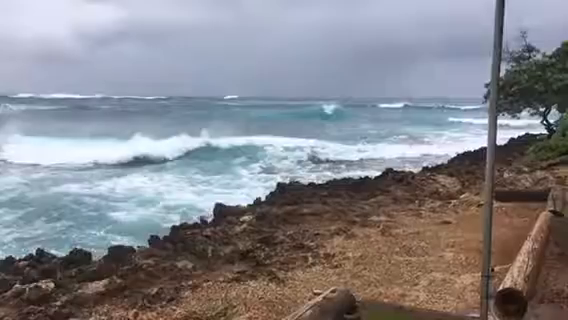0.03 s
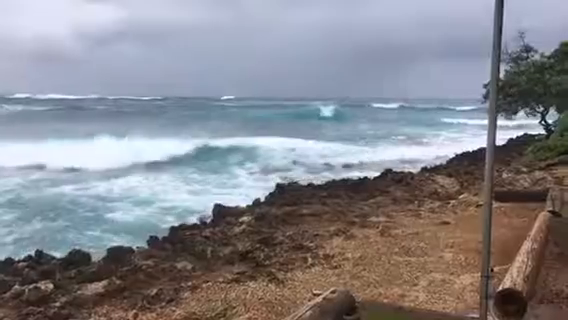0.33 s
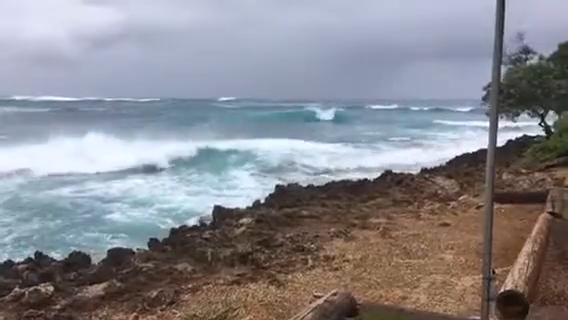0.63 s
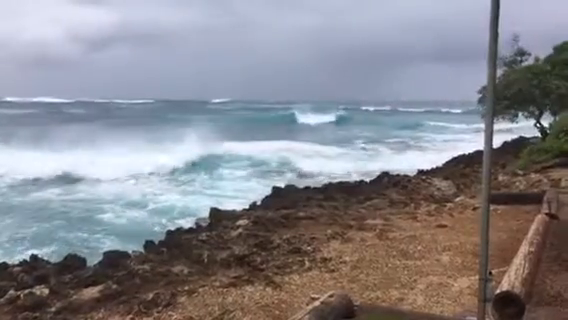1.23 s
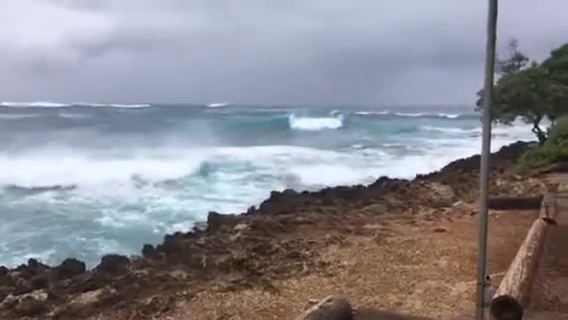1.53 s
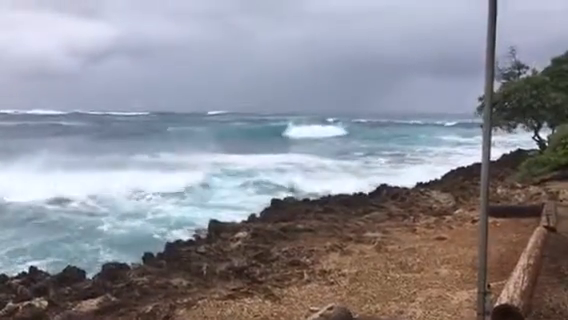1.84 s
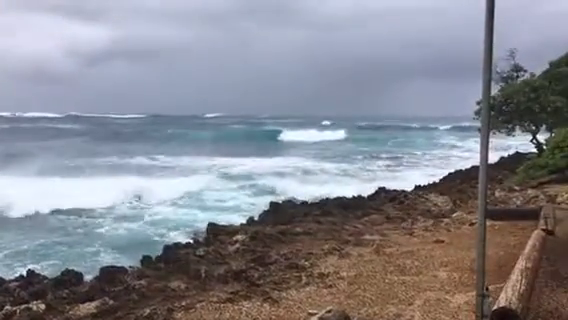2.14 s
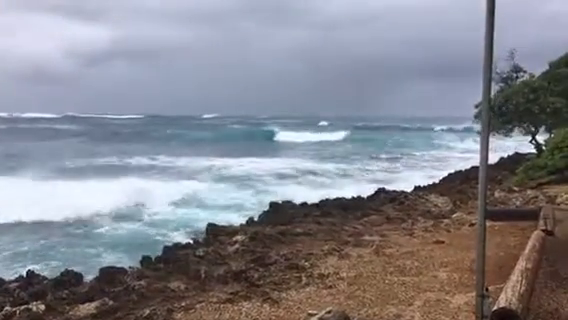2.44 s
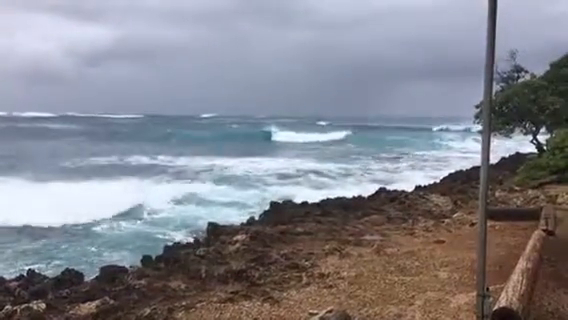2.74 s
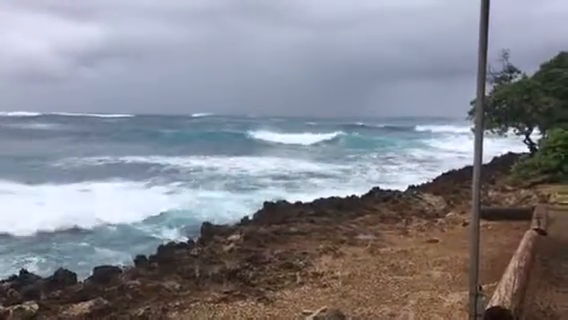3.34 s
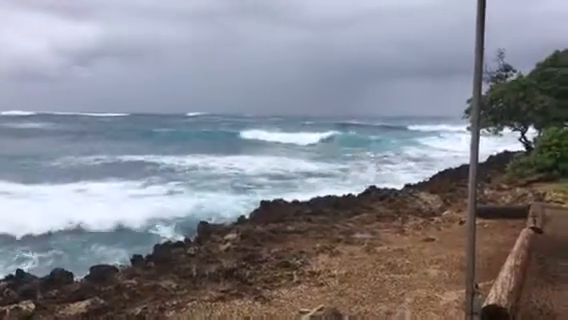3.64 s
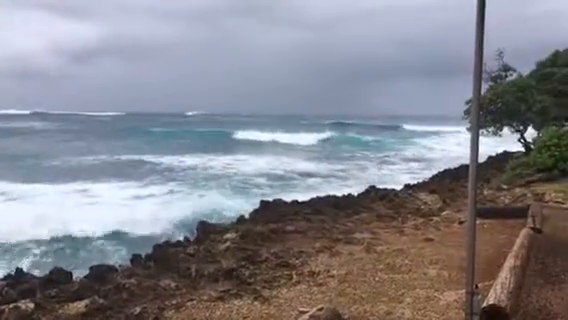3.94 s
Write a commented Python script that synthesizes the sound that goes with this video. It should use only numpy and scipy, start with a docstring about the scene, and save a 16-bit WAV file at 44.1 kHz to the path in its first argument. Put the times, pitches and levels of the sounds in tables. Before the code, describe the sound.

Ocean waves break with hissing foam as wind rumbles and thumps on the microphone.

```python
"""Surf breaks on a rocky shore: a steady roar, and foam that hisses louder as a wave washes in.
Gusty wind rumbles on the microphone; eddies flutter across it and the sharpest ones thump.
Roar, foam and wind are coloured noise riding level curves; each thump is one pressure pulse.
Two tiny ticks sound close by. The sound begins after a moment of silence."""
import sys
import numpy as np
from scipy import signal
from scipy.fft import rfft, irfft, next_fast_len
from scipy.io import wavfile
from scipy.ndimage import uniform_filter1d, map_coordinates

SR = 44100
rng = np.random.default_rng(int(sys.argv[2]) if len(sys.argv) > 2 else 0)


def master_out(mix):
    """Clip the mix to full scale and print it as 16-bit PCM to the path in sys.argv[1]."""
    frames = np.transpose(np.atleast_2d(mix))
    ceiling = np.clip(frames, -1, 1)
    pcm = np.round(ceiling * 32767).astype(np.int16)
    wavfile.write(sys.argv[1], SR, pcm)


N = 176400

# eddies crossing the microphone: t/s, level/dB, half length/s, brightness/(dB per octave)
WIND_EDDIES = [(0.137, -24.5, 0.011, 2), (.186, -18.5, 0.011, 4.5), (0.267, -17.5, 0.011, 3),
               (0.3, -15.5, 0.0069, -3), (0.363, -21, 0.015, -0.5), (0.578, -23, 0.0064, 2),
               (.616, -19, .007, -1), (0.64, -19, 0.0048, -3), (0.662, -27, 0.0054, 4.5),
               (0.723, -26, .006, 5.5), (0.757, -25, .01, 1), (0.792, -17.5, .012, 2.5),
               (.93, -15, 0.0056, 0.5), (0.963, -30, 0.023, 6.5), (1.055, -19.5, .017, 1),
               (1.144, -26, .008, 6.5), (1.207, -15.5, 0.0086, -3), (1.335, -15.5, .005, 0.5),
               (1.357, -18.5, 0.0055, -2), (1.553, -20.5, 0.013, -3.5), (1.683, -22.5, .011, 1.5),
               (1.873, -27, 0.0064, -4), (2.016, -30, .008, -1), (2.358, -17.5, .013, 1),
               (2.41, -26, 0.009, -3), (2.648, -25.5, 0.023, 2.5), (2.713, -16.5, .009, 1),
               (2.858, -21, 0.01, 2.5), (3.127, -20.5, 0.013, 2), (3.224, -21, 0.015, 2),
               (3.379, -30, 0.024, 6), (3.466, -19, 0.017, -0.5), (3.56, -32, .008, 3),
               (3.66, -22, .012, -1), (3.695, -21, 0.0066, 1.5), (3.727, -15, .005, -1),
               (3.808, -22.5, 0.0057, 1.5), (3.839, -28, 0.0061, 7), (3.909, -33, 0.019, 6)]


def breakers():
    """The steady roar of white water, churning slightly."""
    # swell of the roar: t/s, level/dB
    roar_levels = [(.12, -34), (.5, -33), (.85, -34), (.95, -30.5), (1.1, -33.5), (1.6, -34), (2.1, -33),
                   (2.4, -34), (2.7, -33.8), (3, -35.5), (3.5, -34.5), (4, -36)]
    # tone of the roar: f/Hz, level/dB
    roar_spectrum = [(60, 2), (200, -0.5), (500, 0), (800, -3), (1300, -4.5), (2000, -5.5), (2700, -12),
                     (3300, -10.5), (5000, -28), (16000, -60)]
    churn_db = 0.39 * wobble(per_s=11)
    return amp(curve(roar_levels) + churn_db) * rush(roar_spectrum, patchy_db=0.96)


def foam():
    """Foam hisses on the rocks, with a fine crackle of bursting bubbles."""
    # wash of the foam: t/s, level/dB
    foam_levels = [(.12, -42), (.22, -43.5), (.29, -42.5), (.4, -45), (.55, -44), (.82, -46), (.92, -41),
                   (1.02, -43), (1.47, -42), (1.56, -39), (1.68, -42), (1.97, -40), (2.07, -41.5),
                   (2.3, -40.8), (2.75, -42.7), (3.12, -42.5), (3.52, -44.5), (3.63, -42.5), (4, -45.2)]
    # tone of hiss and crackle: f/Hz, level/dB
    foam_spectrum = [(800, -12), (2600, -4.5), (3300, 0), (4300, 1.5), (4900, -4.5), (5400, -1.5),
                     (6400, 1.5), (8000, -1.5), (9000, 0), (9800, -2.5), (10400, -7.5), (11100, -4.5),
                     (12500, -10), (15500, -15.5)]
    pops_per_s, crackle_db = 460, -9.5  # level relative to the hiss
    pops = (rng.random(N) < pops_per_s / SR) * rng.standard_normal(N)
    crackle = unit(filtered(pops, colour(foam_spectrum)))
    wash = amp(curve(foam_levels) + 0.23 * wobble(per_s=18))
    hiss = rush(foam_spectrum, patchy_db=0.96)
    return wash * (hiss + amp(crackle_db) * crackle)


def wind_rumble():
    """Low, lumpy turbulence on the microphone follows the gusts and lifts around each eddy."""
    # strength of the gusts: t/s, level/dB
    gust_levels = [(.12, -17), (.17, -13.5), (.235, -20.5), (.31, -13), (.37, -22), (.44, -23.5),
                   (.56, -14), (.69, -16), (.81, -16), (.87, -21), (.93, -18), (1.06, -18), (1.16, -25.5),
                   (1.25, -22.5), (1.29, -26), (1.37, -25.5), (1.47, -26), (1.56, -28.5), (1.66, -24.5),
                   (1.9, -28.5), (2.12, -25), (2.36, -27.5), (2.5, -26.5), (2.62, -19), (2.71, -22.5),
                   (2.79, -26), (3.05, -27), (3.16, -22.5), (3.23, -26.5), (3.34, -29), (3.5, -22.5),
                   (3.78, -26.5), (3.86, -19), (3.95, -20.5), (4, -23.5)]
    # tone of the rumble: f/Hz, level/dB
    rumble_spectrum = [(15, -45), (25, -30), (36, -6.5), (55, -0.5), (75, -1.5), (110, -7.5), (170, -11.5),
                       (250, -19), (400, -31.5), (800, -42), (3000, -89)]
    surge_db, surge_half_s = 3, 0.019
    t = np.arange(N) / SR
    air = unit(filtered(rng.standard_normal(N), colour(rumble_spectrum)))
    power = np.abs(uniform_filter1d(air ** 2, size=3000))
    air = air / np.sqrt(power + 1e-6)  # level the noise so the gusts shape it
    surges = [np.exp(-.5 * ((t - at_s) / surge_half_s) ** 2) for at_s, *_ in WIND_EDDIES]
    lift_db = surge_db * (np.max(surges, axis=0) - 0.5)
    lumps_db = 1.9 * wobble(per_s=22.24)
    return amp(curve(gust_levels) + lift_db + lumps_db) * air


def eddies():
    """Each eddy is a brief, fluttering swell of brighter turbulence."""
    # tone of an eddy before its brightness tilt: f/Hz, level/dB
    eddy_spectrum = [(30, -19), (80, 2), (160, 2), (300, -4.5), (550, -9.5), (800, -21.5), (1300, -30),
                     (2500, -54), (8000, -84)]
    flutter_per_s, flutter_db = 170.3, 4.5
    out, t = np.zeros(N), np.arange(-SR // 12, SR // 12) / SR
    for at_s, db, half_s, bright_db in WIND_EDDIES:
        tone = lambda hz: colour(eddy_spectrum)(hz) * amp(bright_db * np.log2(hz + 1))
        flutter = map_coordinates(rng.standard_normal(128), [(t - t[0]) * flutter_per_s], mode="mirror")
        swell = np.exp(-.5 * (t / half_s) ** 2)
        puff = swell * amp(flutter_db * flutter) * filtered(rng.standard_normal(len(t)), tone)
        add(out, at_s + t[0], amp(db) * puff * np.linalg.norm(swell) / np.linalg.norm(puff))
    return out


def thumps():
    """A sharp eddy gives one rounded push, and the microphone port swings back."""
    # pressure pulses: t/s, peak level/dB, corner f/Hz
    pulses = [(0.1924, -5, 530), (.252, -11.5, 1010), (.283, -17, 202), (.637, -12.5, 497),
              (.791, -18.5, 550), (0.93, -11.5, 444), (1.046, -17, 800), (1.333, -7.5, 595),
              (2.353, -13, 540), (2.714, -12, 900), (3.119, -17, 550), (3.506, -16.5, 550),
              (3.726, -7.5, 640)]
    port_hz, port_q, top_hz = 190, 1.37, 1690
    port = lambda hz: (hz / port_hz) ** 2 / (1 + 1j * hz / port_hz / port_q - (hz / port_hz) ** 2)
    treble_cut = lambda hz: 1 / (1 + 1.2j * hz / top_hz - (hz / top_hz) ** 2)
    out = np.zeros(N)
    for at_s, db, corner_hz in pulses:
        rounded = lambda hz: 1 / (1 + 1j * hz / corner_hz - (hz / corner_hz) ** 2)
        push = filtered(signal.unit_impulse(SR // 20), lambda hz: rounded(hz) * port(hz) * treble_cut(hz))
        add(out, at_s, amp(db) * push / np.abs(push).max())
    return out


def ticks():
    """Tiny bright ticks, perhaps drops of spray landing nearby."""
    # tick cues: t/s, peak level/dB, centre f/Hz
    cues = [(3.562, -31, 11000), (3.637, -28, 6300)]
    decay_s, width_octaves = 0.0014, 0.27
    out, t = np.zeros(N), np.arange(SR // 50) / SR
    for at_s, db, centre_hz in cues:
        band = lambda hz: np.exp(-.5 * (np.log2((hz + 1) / centre_hz) / width_octaves) ** 2)
        tick = filtered(rng.standard_normal(len(t)), band) * np.exp(-t / decay_s)
        add(out, at_s, amp(db) * tick / np.abs(tick).max())
    return out


def rush(spectrum, patchy_db):
    """Coloured noise of rms 1, with patches of random gain across time and frequency."""
    bins = signal.stft(rng.standard_normal(N), nperseg=512)[2]
    patches = uniform_filter1d(rng.standard_normal(bins.shape), size=7, axis=0)
    patches = uniform_filter1d(patches, size=14, axis=1)
    noise = signal.istft(bins * amp(patchy_db * unit(patches)), nperseg=512)[1][:N]
    return unit(filtered(noise, colour(spectrum)))


def amp(db):
    """Decibels to gain."""
    return 10 ** (np.asarray(db) / 20)


def unit(x):
    """Scale to rms 1."""
    return x / np.sqrt(np.mean(x ** 2) + 1e-20)


def curve(rows):
    """One value per sample from rows of t/s, value."""
    return np.interp(np.arange(N) / SR, *np.transpose(rows))


def wobble(per_s):
    """A smooth random curve with per_s knots a second."""
    knots = rng.standard_normal(int(N * per_s / SR) + 4)
    return map_coordinates(knots, [np.arange(N) * per_s / SR])


def filtered(x, response):
    """Filter x by a gain given as a function of frequency."""
    size = next_fast_len(len(x) + 8192)
    hz = np.fft.rfftfreq(size, 1 / SR)
    return irfft(rfft(x, size) * response(hz), size)[:len(x)]


def colour(spectrum):
    """An EQ curve through rows of f/Hz, level/dB on a log frequency axis."""
    f, db = np.transpose(spectrum)
    return lambda hz: amp(np.interp(np.log(hz + 1), np.log(f + 1), db))


def add(out, at_s, x):
    """Mix x into out from time at_s."""
    i = max(round(at_s * SR), 0)
    out[i:i + len(x)] += x[:len(out[i:])]


def scene():
    """The sea ahead and the wind on the microphone, in mono."""
    return (breakers() + foam() + wind_rumble() + eddies() + thumps() + ticks())[None]


def record(dry):
    """The microphone rolls off the deepest bass; the sound opens after a moment, its top treble cut."""
    start_s, fade_s = .12, .002
    low_cut_hz, top_hz = 27, 15750
    fade_in = np.clip((np.arange(N) / SR - start_s) / fade_s, 0, 1)
    heard = filtered(dry[0], lambda hz: hz ** 4 / np.hypot(hz ** 4, low_cut_hz ** 4))
    return filtered(heard * fade_in, lambda hz: hz < top_hz)[None]


dry = scene()
out = record(dry)
master_out(out)
```